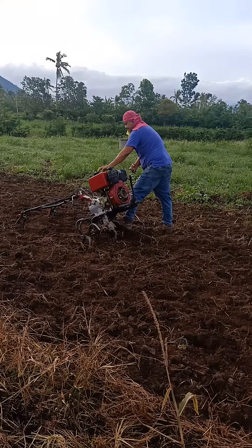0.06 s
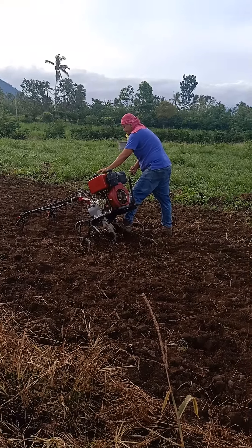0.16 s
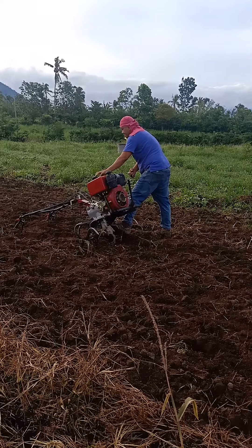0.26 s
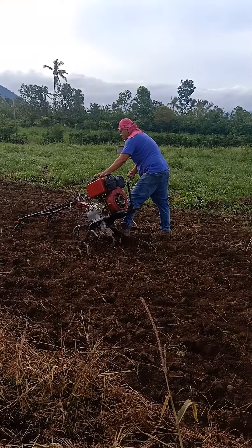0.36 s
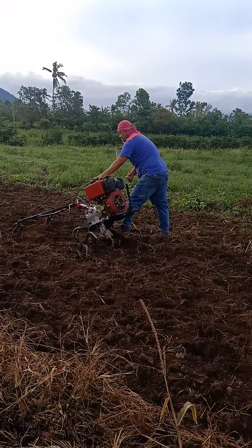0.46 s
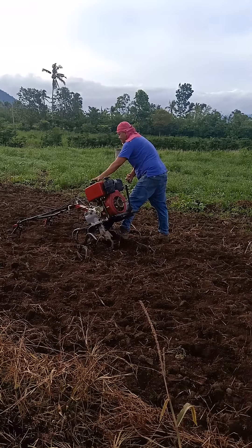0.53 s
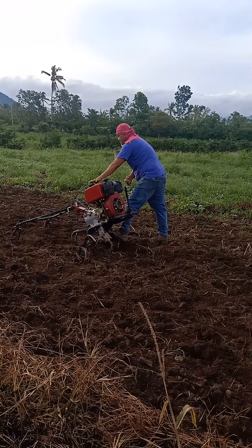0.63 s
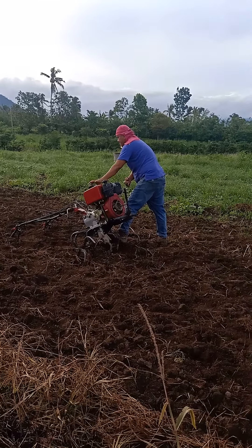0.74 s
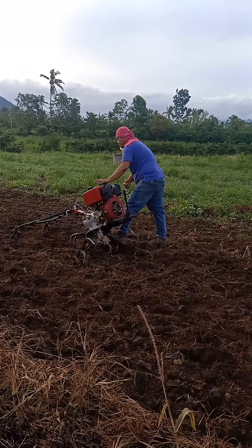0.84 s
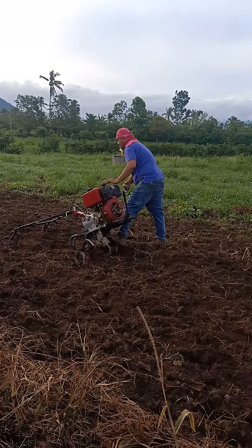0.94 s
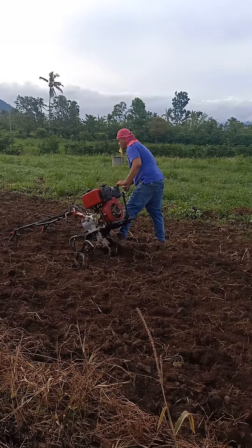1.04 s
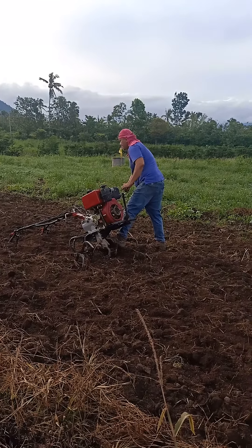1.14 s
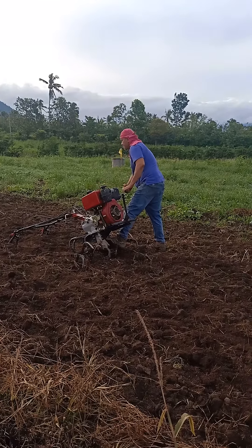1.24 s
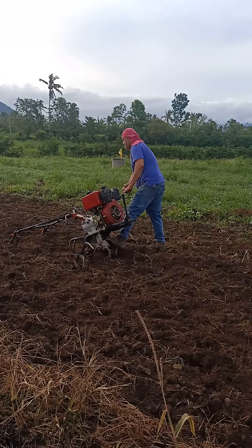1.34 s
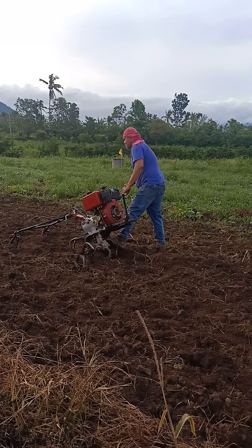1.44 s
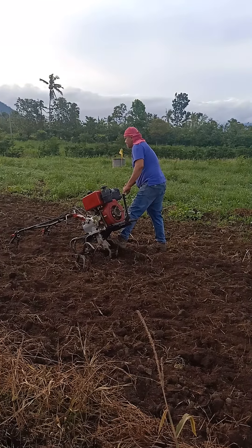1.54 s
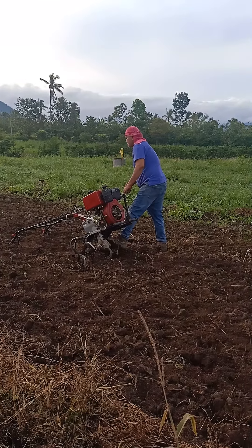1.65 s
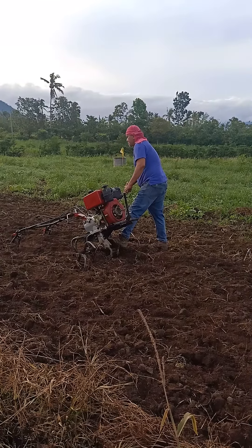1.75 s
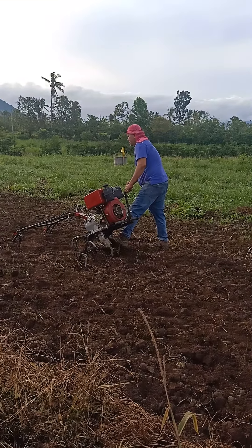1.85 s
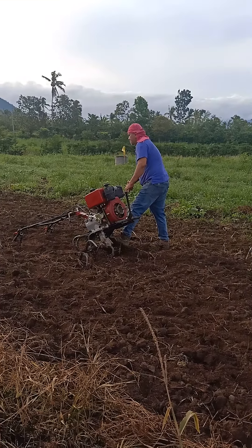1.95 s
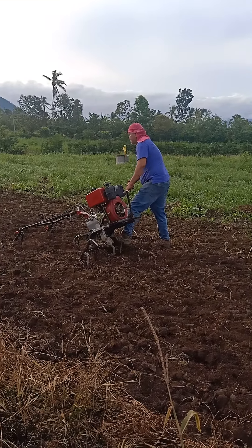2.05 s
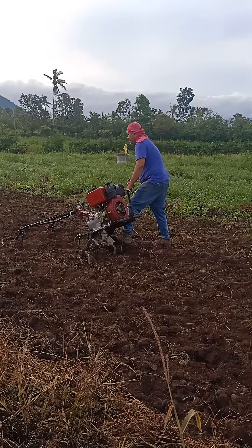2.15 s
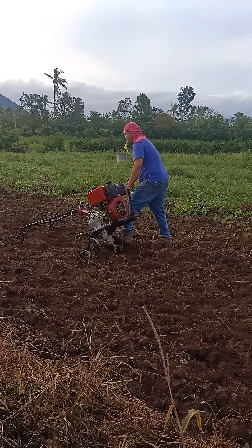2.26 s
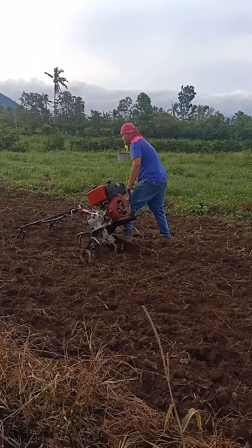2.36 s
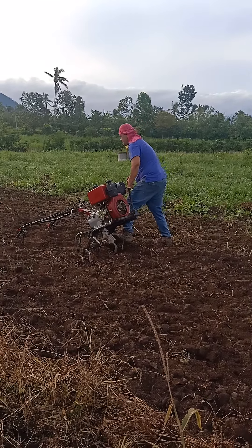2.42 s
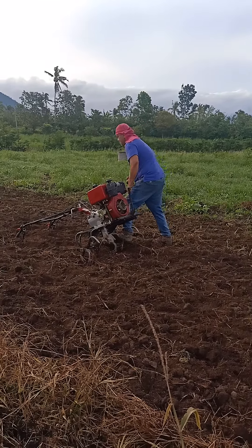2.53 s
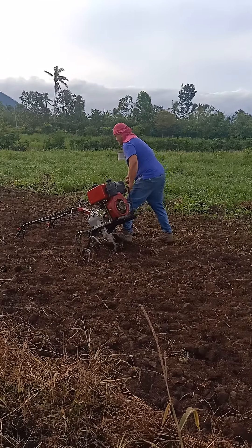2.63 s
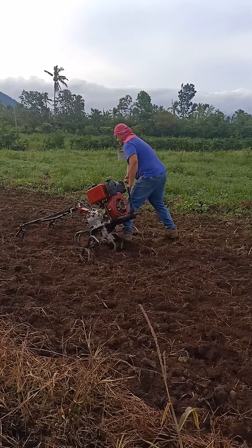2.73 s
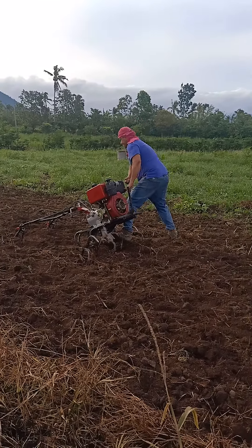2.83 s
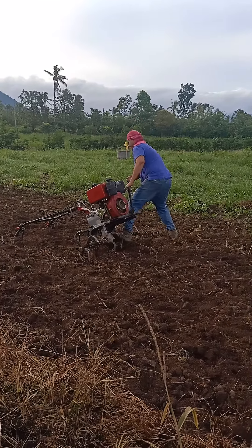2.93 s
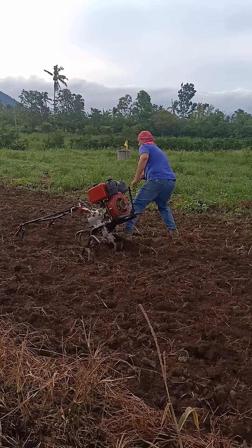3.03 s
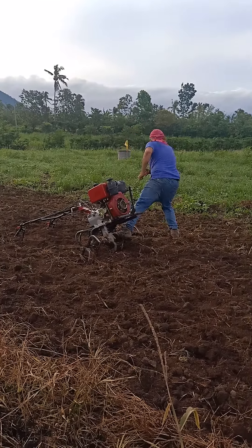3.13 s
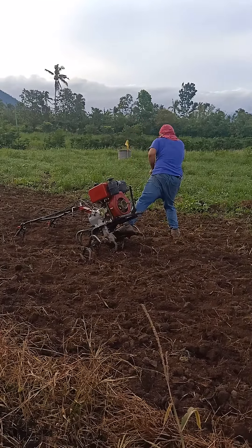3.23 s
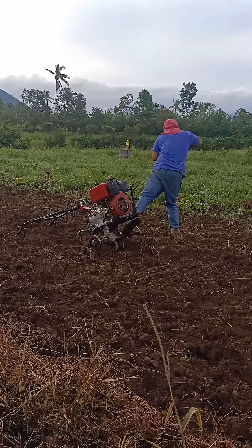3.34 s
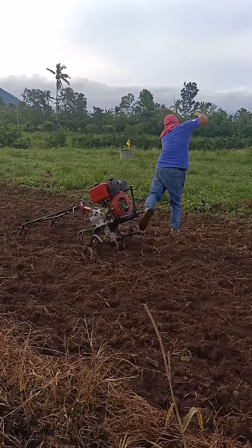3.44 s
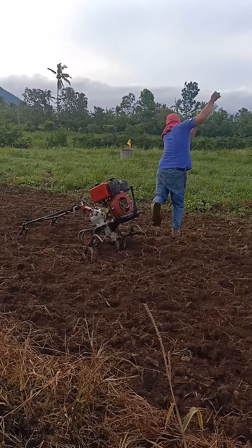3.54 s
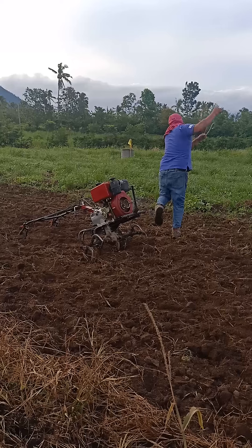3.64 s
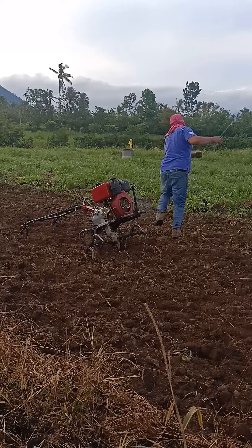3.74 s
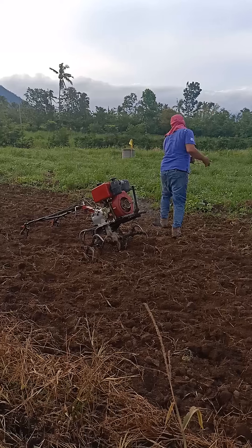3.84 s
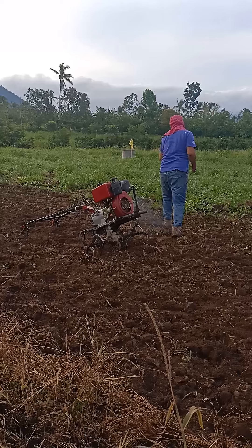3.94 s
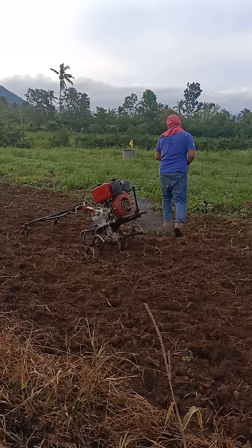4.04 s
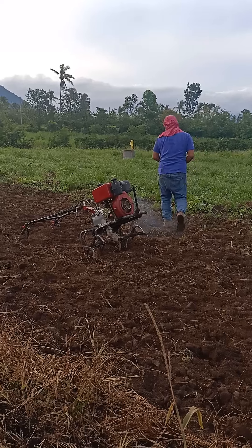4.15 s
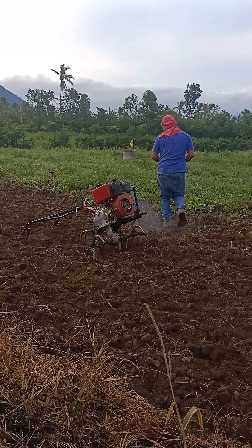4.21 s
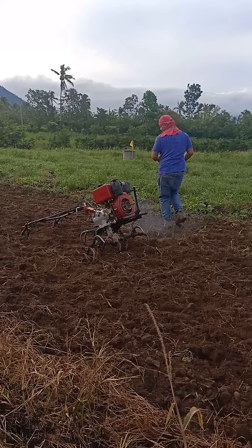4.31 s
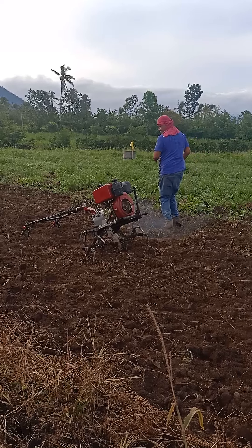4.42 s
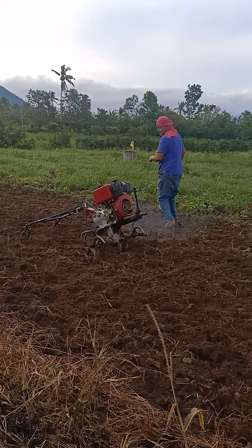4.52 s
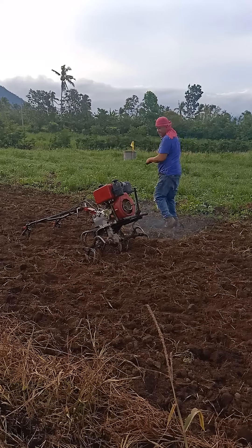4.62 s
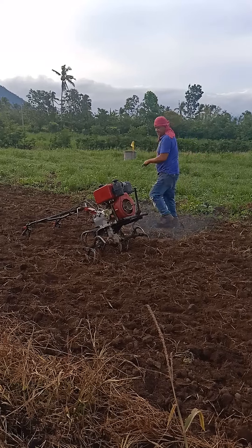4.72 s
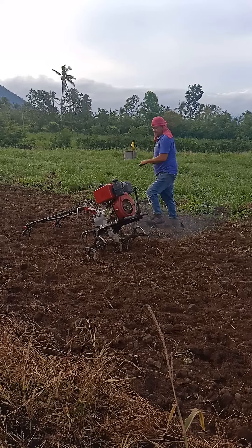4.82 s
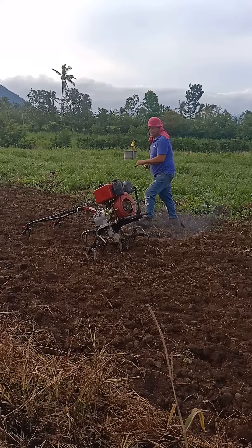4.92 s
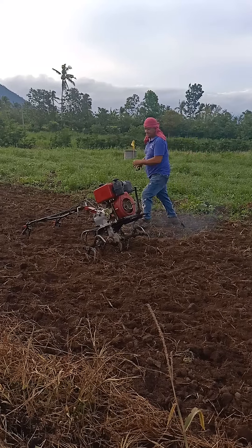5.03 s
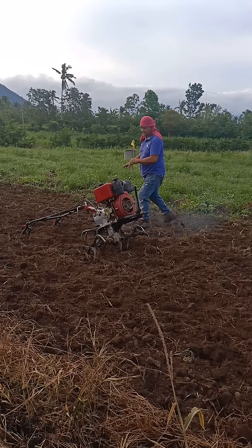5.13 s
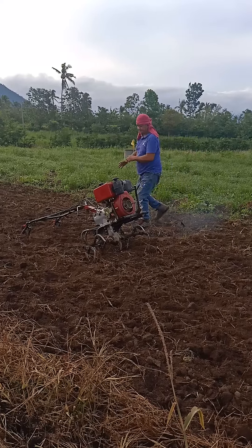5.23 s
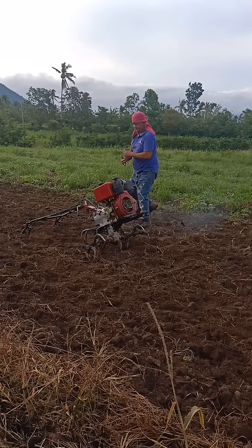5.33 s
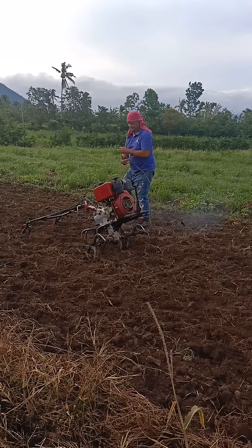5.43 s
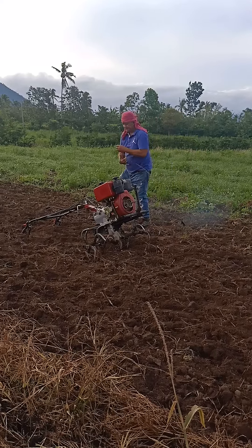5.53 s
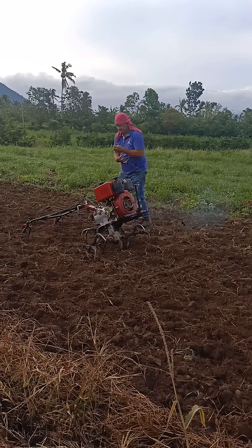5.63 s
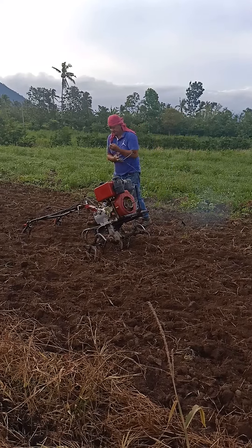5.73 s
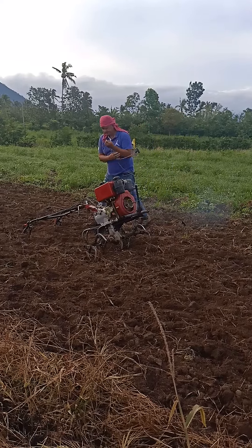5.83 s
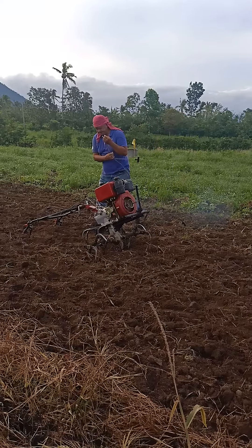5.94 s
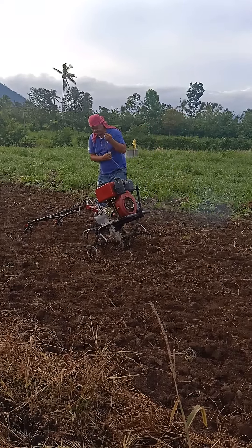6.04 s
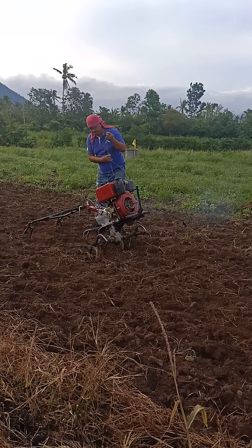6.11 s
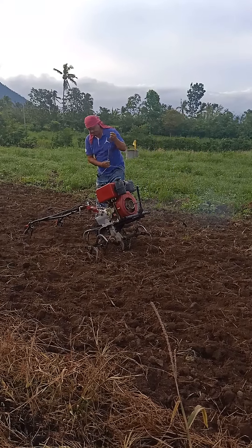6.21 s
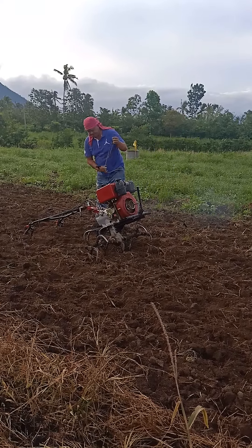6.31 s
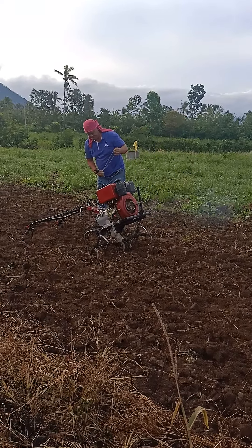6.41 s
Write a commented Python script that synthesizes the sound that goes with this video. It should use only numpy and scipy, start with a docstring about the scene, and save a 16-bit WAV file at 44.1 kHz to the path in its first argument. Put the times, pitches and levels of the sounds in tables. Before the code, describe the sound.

A quiet morning field heard in stereo from several meters away. From 0 to 0.3 s a close rooster ends its crow, a hoarse, fluttering tone sliding down and cutting off. Until 3 s there is soft leafy air and insect hiss, high cricket chirps several times a second, small quick bird chirrups, and thin distant rooster notes around 0.9 to 2.4 s. At about 3.1 s a rope pull starts: small clinks and dull knocks as the engine turns over. At 3.35 s it catches with a rough loud burst, and near 3.47 s the rope end strikes the pulley, leaving a wavering steel ring. Hard separate diesel knocks quicken from roughly six to nineteen per second by 4.15 s. From about 4.4 s the knocking softens and settles near twenty-one beats per second, a steady metallic clatter with valve taps, tin rattle and low muffled exhaust, continuing to the end at 6.4 s.

```python
"""A rooster close by is heard first, ending its crow, in a field in the morning. Crickets chirp, small
birds call and far roosters answer, all as gliding tones over shaped noise, heard at two microphone ports.
A rope is pulled round the flywheel of a one-cylinder diesel tiller; it catches, knocks hard, speeds up
and settles. Blows ring resonances of block and head, gas pulses the muffler, and shaken noise is tin."""
import sys
import numpy as np
from scipy import signal
from scipy.fft import rfft, irfft, next_fast_len
from scipy.io import wavfile
from scipy.ndimage import map_coordinates

SR = 44100
rng = np.random.default_rng(int(sys.argv[2]) if len(sys.argv) > 2 else 0)


def wav_out(sig):
    """Save sig, one row per channel (or a flat mono array), as 16-bit PCM at SR to the path in sys.argv[1]."""
    wavfile.write(sys.argv[1], SR, np.round(np.clip(np.atleast_2d(sig).T, -1, 1) * 32767).astype(np.int16))


N = 285327
T = np.arange(N) / SR  # t/s of every sample

# far leaves, insects and road, spectrum shape: (f/Hz, relative level/dB per Hz)
FIELD_SPECTRUM = [(24, -56), (40, -18), (120, -9.5), (484, -18), (881, 1.5), (1130, -13), (1770, -5),
                  (2700, -17.5), (3650, -18.5), (5050, -1), (6160, -14.5), (6810, -38), (8110, -22),
                  (9650, -48.5), (13300, -35), (15500, -42)]
# how alike the field is at the two ports: (f/Hz, likeness from -1 to 1)
FIELD_LIKENESS = [(60, 1), (180, 0.27), (550, 0.81), (1650, 0.67), (4970, -0.49), (15000, 0.51)]
# echoes from trees and ground: (f/Hz, t60/s)
ECHO_DECAY = [(200, 0.23), (2000, 0.53), (8000, 0.098)]
# far roosters, one table a note: (t/s, pitch f/Hz, relative level/dB)
FAR_CROWS = [
    [(.88, 860, -69), (.98, 950, -62), (1.1, 1022, -60), (1.2, 933, -60), (1.32, 836, -76)],
    [(.85, 1505, -79), (1.0, 1540, -73), (1.18, 1450, -76)],
    [(1.3, 1450, -67), (1.48, 1482, -76), (1.62, 1396, -69), (1.82, 1350, -74)],
    [(1.79, 1813, -53), (1.92, 1820, -64), (2.06, 1780, -77)],
    [(2.1, 1000, -62), (2.3, 950, -72), (2.42, 790, -51)],
]
# near crickets, one row a chirp: (t/s, peak level/dB, nominal f/Hz, stroke spacing/s)
CHIRPS = [(0.021, -51.5, 4630, .037), (0.152, -40, 4720, 0.036), (.327, -50, 4680, .037),
          (.433, -39, 4780, 0.036), (0.477, -42.5, 5150, 0.053), (.596, -49, 4750, 0.04),
          (0.685, -40, 4740, 0.037), (.865, -50, 4730, 0.033), (0.937, -40, 4740, .0355),
          (1.136, -51, 4720, .035), (1.188, -42, 4690, .035), (1.333, -56, 5080, .056),
          (1.405, -50, 4740, .035), (1.441, -42.5, 4700, .0355), (1.674, -49, 4780, 0.031),
          (1.723, -41.5, 4700, .037), (1.943, -47, 4800, 0.031), (1.976, -42.5, 4700, .035),
          (2.209, -50, 4750, .035), (2.228, -43.5, 4690, 0.036), (2.481, -48.5, 4680, .0365),
          (2.577, -55, 5180, 0.058), (2.746, -48.5, 4750, 0.036), (2.755, -53, 4890, 0.04),
          (3.016, -50, 4800, 0.04)]
# the three wing strokes of a chirp: (level/dB relative to the chirp)
WING_STROKES = [-1.5, 0, 0]
# five bird phrases, one row a note: (t/s after the call starts, length/s, from f/Hz, to f/Hz, relative level/dB)
BIRD_PHRASES = [
    [(0, .02, 3800, 2350, 0), (.045, .01, 2200, 1900, -9), (.057, .015, 2100, 2900, -2)],
    [(0, .017, 4000, 2750, 0), (.022, .012, 2700, 1750, -8), (.038, .008, 3000, 2450, 0),
     (.048, .02, 2300, 3350, -1)],
    [(0, .017, 4000, 3250, 0), (.021, .012, 2900, 2250, -7), (.037, .012, 2900, 2620, 0),
     (.047, .022, 2850, 3450, -2)],
    [(0, .085, 5300, 7000, 0)],
    [(0, .012, 3600, 3000, 0)],
]
# bird calls, one table a phrase: (t/s, peak level/dB, pitch factor)
BIRD_CALLS = [
    [(.772, -42.5, 1.006), (1.019, -39.5, 1.08)],
    [(1.234, -40, 1)],
    [(1.427, -40.5, 0.98), (1.595, -42, 1), (1.752, -42.5, 1), (1.912, -43, 1.01), (2.122, -42.5, 1.02)],
    [(.51, -42.5, 1), (1.98, -42, 0.98)],
    [(.676, -58, 1), (2.81, -56, .9)],
]
# near rooster's voice before the throat: (t/s, pitch f/Hz, relative level/dB)
CROW = [(0.0, 695, -36.5), (0.018, 691.4, -36.5), (0.104, 680, -35), (0.142, 656, -36.5), (0.21, 636, -38),
        (0.244, 602, -41), (0.28, 544, -34.5), (0.312, 356, -57.5)]
# the rooster's fixed throat: (f/Hz, level/dB)
THROAT = [(350, -6), (540, -23), (610, -5.5), (680, 0), (1100, -13), (1350, -11.5), (1800, -16.5),
          (2100, -5.5), (2400, -26), (2650, -37), (2880, -36), (3040, -15), (3200, -42)]
# engine at the two ports: (f/Hz, nominal left-right level/dB, nominal left lead/rad)
ENGINE_PORTS = [(85, -0.6, 0.02), (300, -1.5, 0.43), (480, -4.7, 1.0), (750, 3.0, -0.63),
                (870, -1.6, -0.59), (1130, -4.8, 1.02), (1300, -0.7, 1.07), (1650, 4.3, -0.02),
                (1900, -1.3, 0.2), (2500, 4.6, 1.2), (3300, 0.5, 1.11), (3800, -4.3, 0.36),
                (4800, -2.3, 1.86), (6000, 6.1, 2.52), (8000, 1, 2.2), (13200, -5, 1.7)]
# knocks as the rope turns the engine over, then the noisy burst of the first firing:
# (t/s, relative peak level/dB, relative treble level/dB)
PULL_AND_CATCH = [(3.086, -41, -12), (3.103, -35, -20), (3.201, -23.5, -4), (3.233, -26, -14),
                  (3.258, -27, -29), (3.298, -28, -42), (3.352, -12.5, -17), (3.365, -12.5, -7.5),
                  (3.374, -9.5, -13)]
# small parts chatter as the rope tightens: (t/s, level/dB, f/Hz, width/Hz, length/s)
CLINKS = [(3.088, -33, 4780, 110, .018), (3.292, -36, 2030, 70, .014)]
# pulley resonances: (f/Hz, level/dB, t60/s)
PULLEY = [(1940, -5, 0.54), (3262, 0.5, 1.0), (3430, -6.5, 0.33), (3900, -14, 0.18), (4490, -6, .35),
          (4522, -3.5, 0.48), (4845, -8, 0.35), (5450, 1, 0.44), (5980, -5, 0.22), (6550, -11, 0.21),
          (7300, -5, 0.16), (8500, -14, 0.08), (13500, -15, 0.056)]
# the rope end leaves the pulley: (t/s, level/dB)
ROPE_SLIP = (3.468, -28.5)
# engine speed from the first firing: (t/s, firings per s)
SPEED = [(3.3569, 5.752), (3.5, 8.123), (3.7, 11.62), (3.95, 16.39), (4.15, 19.084), (4.4, 20.443),
         (4.8, 20.916), (5.3, 21.168), (6, 21.281), (6.47, 21.172)]
# fuelling, full while the engine gains speed, cut back by the governor: (t/s, knock level/dB)
FUEL = [(3.357, -23), (3.5, -11.5), (3.78, -11.5), (3.87, -12), (4.0, -11.5), (4.12, -12.5), (4.27, -16.5),
        (4.5, -18.5), (5.08, -19), (5.4, -16), (6.47, -18)]
# running engine: (t/s, relative rattle and tap level/dB, exhaust blow level/dB, breathing level/dB)
RUNNING = [(3.0, -61, -24, -19), (3.11, -42, -35, -42), (3.55, -29, -24.5, -39),
           (3.65, -27.5, -22.5, -35.5), (4.0, -30.5, -22, -34), (4.49, -29.5, -29.5, -28),
           (5.21, -26.5, -23, -26.5), (6.47, -25.5, -24.5, -23)]
# engine block: (f/Hz, width/Hz, level/dB rung by any firing, level/dB by a hard knock, level/dB by taps)
BLOCK = [(288, 14.4, -38, -37, -20), (384.5, 69, -31, -14, -10), (465, 32, -35, -20.5, -15.5),
         (749.3, 53.5, -3, -70, -0.5), (865, 53, 3, -8.5, 1), (893, 45, 1.5, 1.5, -12),
         (1134, 70.5, 6, -12.5, 1.5), (1362, 153, -4.5, -4, -1), (1771, 31, -22, 0, -36),
         (1855, 135, -3, -1.5, 2.5), (2042, 42, -14.5, -4.5, -1.5), (2290, 170, -4, -2.5, -28)]
# cylinder head: (f/Hz, width/Hz, level/dB)
HEAD = [(2820, 102, -5.5), (3150, 96, -14), (3770, 380, -4), (4747, 52, -11), (5040, 230, -5.5),
        (6110, 640, -2), (13200, 1500, -27)]
# valve and piston taps in one cycle: (share of the cycle, relative level/dB)
TAPS = [(0.128, -6.5), (0.261, -3.5), (0.38, -9.5), (.495, -1.5), (0.601, -25), (0.706, -10), (0.839, -8)]
# gas pulses in one cycle, the exhaust blow first: (share of the cycle, signed size)
GAS_PULSES = [(.296, -.6), (.561, 1), (.776, -.77), (.891, .33)]
# unfired gas puffs: (t/s, level/dB)
UNFIRED_PUFFS = [(3.169, -57), (3.193, -54), (3.259, -52), (3.32, -48)]
# muffler resonances: (f/Hz, width/Hz, level/dB)
MUFFLER = [(92, 17, 0), (199, 97, 4)]
# tin and gears, spectrum shape: (f/Hz, relative level/dB per Hz)
TIN_SPECTRUM = [(380, -40), (745, -8.5), (1100, -12.5), (1530, -21.5), (1890, -11.5), (2750, -16.5),
                (3350, -27), (3850, -21.5), (4350, -29), (4800, -22), (6050, -24), (9400, -57.5),
                (13200, -41), (15600, -49)]

BLOCK_FIRED = [(hz, width, db) for hz, width, db, _, _ in BLOCK]
BLOCK_HARD = [(hz, width, db) for hz, width, _, db, _ in BLOCK]
BLOCK_TAPPED = [(hz, width, db) for hz, width, _, _, db in BLOCK]
SETTLED = 4.35  # t/s after which firings scatter in time and strength
TREBLE_DB, TREBLE_GROWS, TREBLE_SCATTER_DB = -8, 1.72, 2  # at a -12 dB knock; dB per knock dB; scatter
THUD_FLOOR_DB, FIRST_THUD_DB, THUD_FADES_DB = -20.5, 2, 10  # relative to the knock; fade is per firing
TOP_HZ = 15700  # microphone band limit


def amp(db):
    """Decibels to gain."""
    return 10 ** (np.asarray(db) / 20)


def unit(x):
    """Scaled to rms 1."""
    return x / np.sqrt(np.mean(x ** 2) + 1e-20)


def along(points, hz):
    """(f/Hz, value) points read on a log axis."""
    f, v = np.transpose(points)
    return np.interp(np.log(hz + 1), np.log(f + 1), v)


def curves(rows):
    """One value per sample for each column after the time."""
    s, *cols = np.transpose(rows)
    return [np.interp(T, s, c) for c in cols]


def wobble(rate):
    """A smooth random curve, rate knots a second."""
    return map_coordinates(rng.standard_normal(int(N * rate / SR) + 4), [T * rate])


def filtered(x, response):
    """x times a complex response of frequency."""
    m = next_fast_len(N + SR // 2)
    return irfft(rfft(x, m) * response(np.fft.rfftfreq(m, 1 / SR)), m)[..., :N]


def rung(times, sizes, modes):
    """Blows into (f/Hz, width/Hz, level/dB) resonances; a size is the swing of a 0 dB mode."""
    times, sizes = np.ravel(times), np.ravel(sizes)
    keep = times < T[-1]
    blows = np.bincount(np.round(times[keep] * SR).astype(int), sizes[keep], N) * SR / (2 * np.pi)

    def response(f):
        return sum((-1) ** k * amp(db) * 1j * f / (c * c - f * f + 1j * f * width)
                   for k, (c, width, db) in enumerate(modes))
    return filtered(blows, response)


def glide(s, length, from_hz, to_hz, db, peak, bend):
    """(first sample, wave) of a gliding tone, loudest at share peak; bend over 1 flattens its end."""
    u = np.linspace(0, 1, round(length * SR))
    hz = to_hz + (from_hz - to_hz) * (1 - u) ** bend
    swell = np.sin(np.pi / 2 * np.minimum(u / peak, (1 - u) / (1 - peak))) ** 0.94
    return round(s * SR), amp(db) * swell * np.sin(2 * np.pi * np.cumsum(hz) / SR)


def place(notes):
    """(first sample, wave) pairs summed into one track."""
    out = np.zeros(N + SR)
    for at, wave in notes:
        out[at:at + len(wave)] += wave
    return out[:N]


def ports(x, lean_db, lag):
    """A source at two microphone ports: left-right level/dB and seconds the right lags."""
    return filtered(x, lambda hz: [amp(side * lean_db / 2) * np.exp(1j * np.pi * side * hz * lag)
                                   for side in (1, -1)])


def outdoors(x, wet_db):
    """Scattered echoes from trees and ground, unrelated at the two ports."""
    hz, t, z = signal.stft(rng.standard_normal((2, SR // 2)), SR, nperseg=256)
    decay = amp(-60 * t / along(ECHO_DECAY, hz)[:, None])
    tail = signal.istft(z * decay, SR, nperseg=256)[1]
    tail = tail / np.linalg.norm(tail[0])
    delayed = np.pad(x, (300, 0))[None]  # samples before the first echo
    return amp(wet_db) * signal.fftconvolve(delayed, tail, axes=1)[:, :N]


def field():
    """Steady far noise, its likeness at the ports varying with pitch; light wind makes the bass lumpy."""
    def spread(hz):
        turn = np.arccos(np.clip(along(FIELD_LIKENESS, hz), -1, 1)) / 2
        return amp(along(FIELD_SPECTRUM, hz)) * [np.cos(turn), np.sin(turn)]
    mid, side = filtered(rng.standard_normal((2, N)), spread)
    air = unit(np.array([mid + side, mid - side]))
    bass = filtered(air, lambda hz: 1 / (1 + (hz / 190) ** 4))
    lumps = amp(2.5 * wobble(11)) - 1
    return amp(-55 + .8 * wobble(3)) * (air + bass * lumps)


def far_roosters():
    """Only one wavering partial of each note carries this far."""
    out = np.zeros(N)
    for note in FAR_CROWS:
        hz, db = curves(note)
        edge = np.clip(np.minimum(T - note[0][0], note[-1][0] - T) / 0.037, 0, 1)
        level = edge * amp(db + 2.0 + 4.0 * wobble(39.75))
        out += level * np.sin(2 * np.pi * np.cumsum(hz * (1 + 0.0089 * wobble(60))) / SR)
    return out


def far_crickets():
    """Faint strokes at random times, each falling in pitch."""
    draw = rng.random((400, 3))
    return place(glide(T[-1] * a, 0.0237, 5200 + 500 * b, 4300 + 500 * b, -66 + 12 * c ** 2,
                       peak=0.23, bend=0.94) for a, b, c in draw)


def near_crickets():
    """A chirp is three wing strokes, each a tone falling in pitch."""
    return place(glide(s + k * gap - .003, 0.02, 1.07 * hz, .87 * hz, db + rel_db, peak=0.44, bend=0.763)
                 for s, db, hz, gap in CHIRPS for k, rel_db in enumerate(WING_STROKES))


def birds():
    """Each call repeats its phrase of gliding notes at its own pitch and level."""
    notes = []
    for phrase, calls in zip(BIRD_PHRASES, BIRD_CALLS):
        for s, db, pitch in calls:
            for after, length, from_hz, to_hz, rel_db in phrase:
                peak, bend = (.6, 2.6) if length < .05 else (.25, 1.05)
                notes.append(glide(s + after, length, from_hz * pitch, to_hz * pitch, db + rel_db, peak, bend))
    return place(notes)


def rooster():
    """Five partials on a falling pitch pass a fixed throat; a fading flutter shakes the loud part."""
    hz, db = curves(CROW)
    flutter = np.sin(2 * np.pi * 62 * T - 1.15) * np.clip(1 - T / .16, 0, 1) ** .6
    turn = 2 * np.pi * np.cumsum(hz * (1 + .035 * flutter + .004 * wobble(200))) / SR
    tone = sum(amp(db + along(THROAT, k * hz) + 6 + 1.2 * flutter) * np.sin(k * turn) for k in range(1, 6))
    return tone * np.clip((CROW[-1][0] - T) / 0.0046, 0, 1)


def pull_and_catch():
    """Knocks of the pull and the rough burst of the catch ring block and head; small parts chatter."""
    s, db, treble_db = np.transpose(PULL_AND_CATCH)
    burst = rng.random((len(s), 10, 2))
    when = s[:, None] + 0.013 * burst[..., 0]
    size = amp(db - 9.5)[:, None] * (2 * burst[..., 1] - 1)
    damped = [(hz, 3 * width, tap_db) for hz, width, tap_db in BLOCK_TAPPED]
    out = rung(when, size, damped)
    out += rung(when, size * amp(treble_db + 7)[:, None], HEAD)
    for at, level_db, hz, width, length in CLINKS:
        chatter = rng.random((16, 2))
        blows = amp(level_db) * (2 * chatter[:, 1] - 1)
        out += rung(at + length * chatter[:, 0], blows, [(hz, width, 0)])
    return out


def rope_slip():
    """The rope end strikes the pulley once, then scrapes; the turning pulley makes the ring waver."""
    s, db = ROPE_SLIP
    scrape = rng.random((12, 2))
    steel = [(hz, np.log(1000) / np.pi / t60, level) for hz, level, t60 in PULLEY]  # t60 to width/Hz
    ring = rung(s + np.append(0, .02 * scrape[:, 0]), amp(db) * np.append(1, .3 * scrape[:, 1]), steel)
    rasp = rung(s + 0.044 * scrape[:, 0], amp(db - 2) * (2 * scrape[:, 1] - 1), HEAD)
    return rasp + ring * amp(3 * wobble(250))


def firings():
    """Speed summed over time gives the firings: their t/s, period/s, knock level/dB and knock gain."""
    done = np.cumsum(curves(SPEED)[0] * (T >= SPEED[0][0])) / SR
    fire = np.interp(np.arange(int(done[-1]) + 1) + 1e-6, done, T)
    knock_db = np.interp(fire, *np.transpose(FUEL))
    period = np.diff(fire, append=2 * fire[-1] - fire[-2])
    fire = fire - .0015 + .00012 * rng.standard_normal(len(fire)) * (fire > SETTLED)
    knock = amp(knock_db + 1.2 * rng.standard_normal(len(fire)) * (fire > SETTLED))
    return fire, period, knock_db, knock


def combustion_knock(fire, knock_db, knock):
    """Firing rings the block, with a low thud; harder knocks are brighter and burst into the head."""
    count, loose = len(fire), fire > SETTLED
    # each combustion is a few blows close together
    out = rung(fire[:, None] + [0, .0018, .0071], np.outer(knock, [.06, .75, .27]), BLOCK_FIRED)
    scatter_db = TREBLE_SCATTER_DB * rng.standard_normal(count)
    hard = knock * amp(TREBLE_DB + TREBLE_GROWS * (knock_db + 12) + scatter_db)
    out += rung(fire[:, None] + [.0024, .0055, .0098], np.outer(hard, [1.1, 1.1, 1.1]), BLOCK_HARD)
    # the thud is strong at the catch and fades with each firing
    thud_at = fire + 0.00297 + .0008 * rng.standard_normal(count) * loose
    thud_db = np.maximum(THUD_FLOOR_DB, FIRST_THUD_DB - THUD_FADES_DB * np.arange(count))
    thud_db = thud_db + 3.3 * rng.standard_normal(count) * loose
    out += rung(thud_at, knock * amp(thud_db), [(418, 37, 0)])
    # the sharp part is a fresh burst every time
    burst = rng.random((count, 12, 2))
    late = 0.019 * burst[..., 0] ** 1.8
    size = hard[:, None] * (2 * burst[..., 1] - 1) * amp(-600 * late + 6.5)
    return out + rung(fire[:, None] + late, size, HEAD)


def valve_and_piston_taps(fire, period):
    """Taps ring the block at set shares of the cycle, harder at speed: (sound, t/s, relative level/dB)."""
    share, tap_db = np.transpose(TAPS)
    chance = rng.standard_normal((len(fire), len(TAPS), 2))
    taps = fire[:, None] + share * period[:, None] + .00004 * chance[..., 0]
    running = amp(np.interp(fire, T, curves(RUNNING)[0]))[:, None]
    faster = (period[-1] / period[:, None]) ** 0.68
    force = running * amp(tap_db + 2 + 1.0 * chance[..., 1]) * faster
    return rung(taps, force, BLOCK_TAPPED), taps, tap_db + 2 * chance[..., 1]


def exhaust(fire, period):
    """Exhaust blow and breathing push gas pulses through the muffler, which passes only the bass."""
    _, blow_db, breath_db = curves(RUNNING)
    blow, breath = (amp(np.interp(fire, T, db)) for db in (blow_db, breath_db))
    share, push = np.transpose(GAS_PULSES)
    push = push * np.transpose([blow] + [breath] * (len(GAS_PULSES) - 1))
    push = push * amp(.5 * rng.standard_normal(push.shape))
    gas = rung(fire[:, None] + share * period[:, None], push, MUFFLER)
    gas += rung(*np.transpose([(t, -amp(db)) for t, db in UNFIRED_PUFFS]), MUFFLER)
    return filtered(gas, lambda hz: 1 / (1 + (hz / 244) ** 24))


def tin_rattle(fire, knock, taps, tap_db):
    """Every blow shakes the loose tin, noise that settles within milliseconds: two unrelated tracks."""
    hits = np.append(fire, taps)
    sizes = np.append(1.26 * (knock / np.median(knock)) ** 0.9, amp(tap_db))
    keep = hits < T[-1]
    jolt = np.bincount(np.round(hits[keep] * SR).astype(int), sizes[keep], N)
    shake = .5 + 0.69 * signal.lfilter([1], [1, -np.exp(-1 / (0.0095 * SR))], jolt)  # 9.5 ms decay
    noise = unit(filtered(rng.standard_normal((2, N)), lambda hz: amp(along(TIN_SPECTRUM, hz))))
    fade_in = np.clip((T - RUNNING[0][0]) / 0.045, 0, 1)
    return noise * shake * amp(curves(RUNNING)[0] - 4.0) * fade_in


def engine():
    """Every cycle knocks, taps, blows gas and shakes tin: (metal, gas, port-difference treble)."""
    fire, period, knock_db, knock = firings()
    tapping, taps, tap_db = valve_and_piston_taps(fire, period)
    rattle, other = tin_rattle(fire, knock, taps, tap_db)
    metal = combustion_knock(fire, knock_db, knock) + tapping + rattle
    # the treble of the rattle reaches the two ports by different ways
    apart = filtered(other, lambda hz: 1.1 * hz ** 2 / (hz ** 2 + 5000 ** 2))
    return metal, exhaust(fire, period), apart


def tiller_ports(x):
    """The tiller at the two ports: level and phase differ with frequency."""
    f, lean_db, lead = np.transpose(ENGINE_PORTS)

    def at_port(hz, side):
        return amp(side * np.interp(hz, f, lean_db) / 2) * np.exp(.5j * side * np.interp(hz, f, lead))
    return filtered(x, lambda hz: [at_port(hz, 0.64), at_port(hz, -1.335)])


def scene():
    """Sources at the two ports; crickets, birds, near rooster and the tiller's metal get echoes."""
    far, near, song, crow = far_crickets(), near_crickets(), birds(), rooster()
    metal, gas, apart = engine()
    metal = metal + pull_and_catch() + rope_slip()
    out = field() + far_roosters()
    out += ports(far, lean_db=8.0, lag=0.00025) + outdoors(far, wet_db=-10)
    out += ports(near, lean_db=-1.5, lag=.000038) + ports(song, lean_db=.1, lag=.00009)
    out += outdoors(near + song, wet_db=-12.5)
    out += ports(crow, lean_db=-3.7, lag=.00011) + outdoors(crow, wet_db=-19)
    return out + tiller_ports(metal + gas) + apart * [[1], [-1]] + outdoors(metal, wet_db=-16)


def record(dry):
    """The microphone clips loud knocks softly, loses the lowest bass and stops at the band limit."""
    soft = dry / (1 + np.abs(dry / 1.05) ** 4) ** (1 / 4)
    return filtered(soft, lambda hz: (hz < TOP_HZ) / (1 + (48 / (hz + 1)) ** 8))


dry = scene()
out = record(dry)
wav_out(out)
```